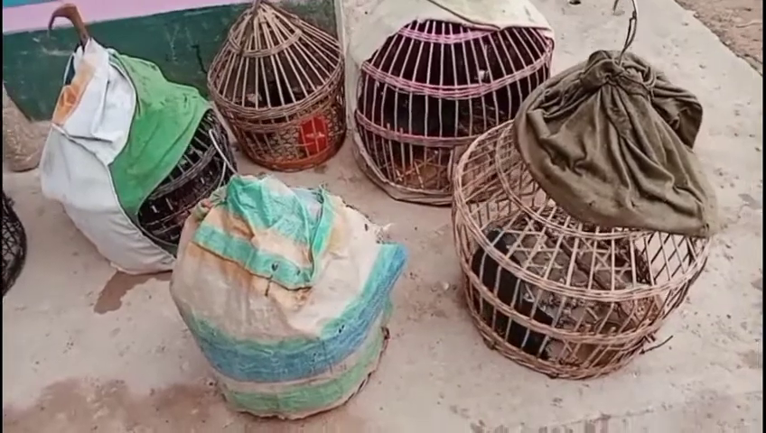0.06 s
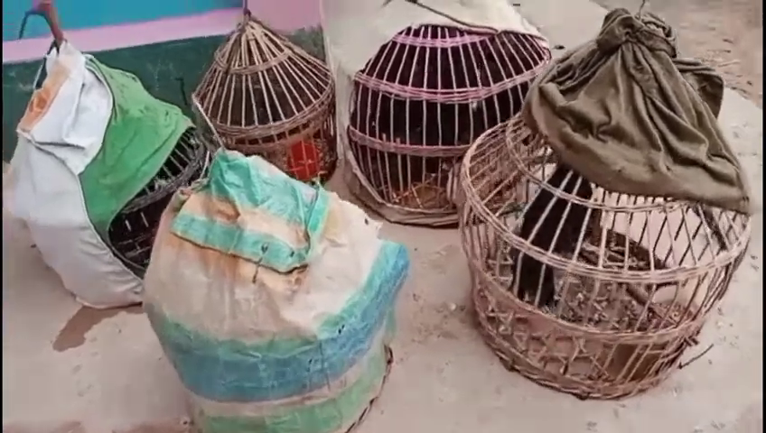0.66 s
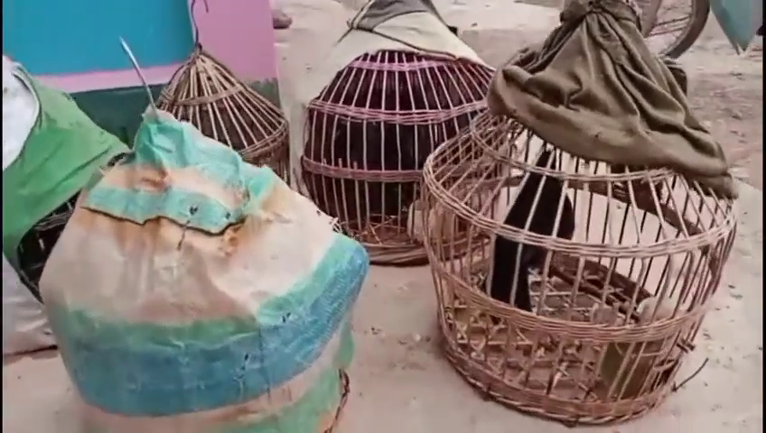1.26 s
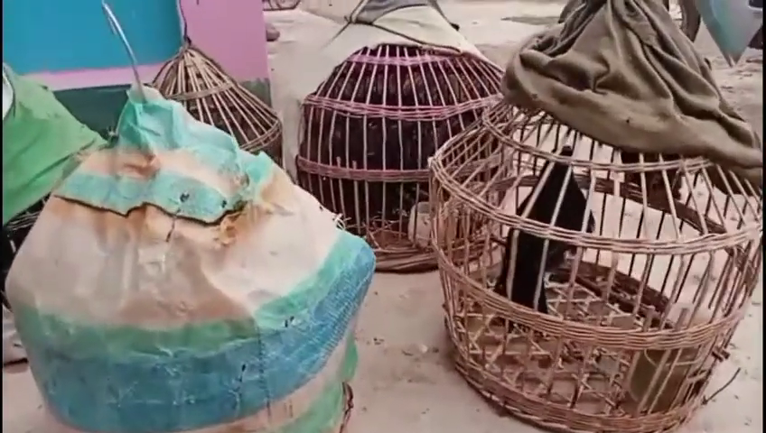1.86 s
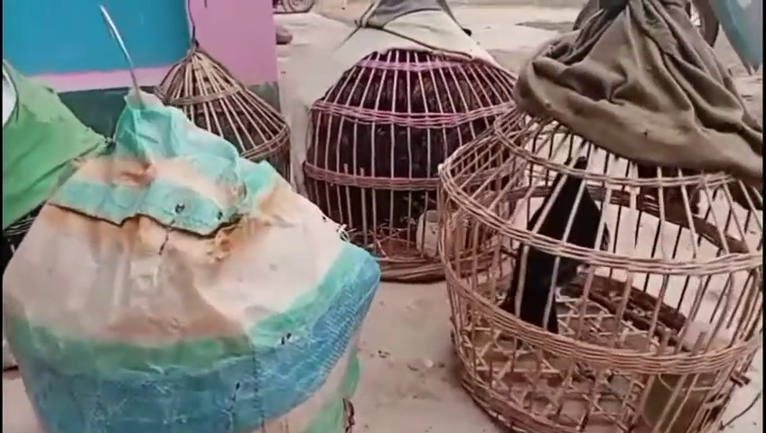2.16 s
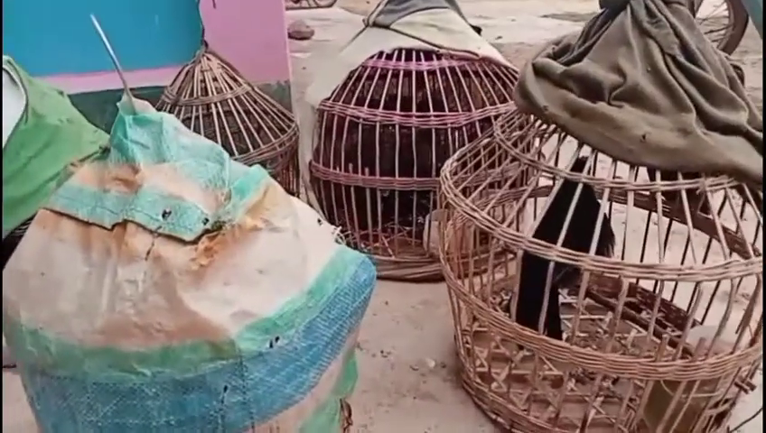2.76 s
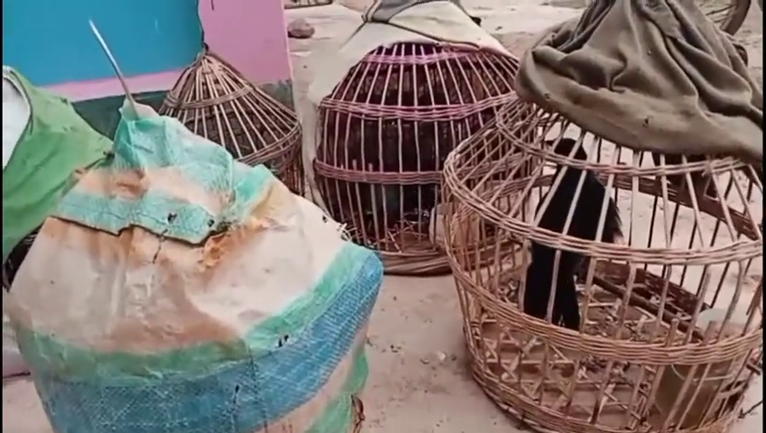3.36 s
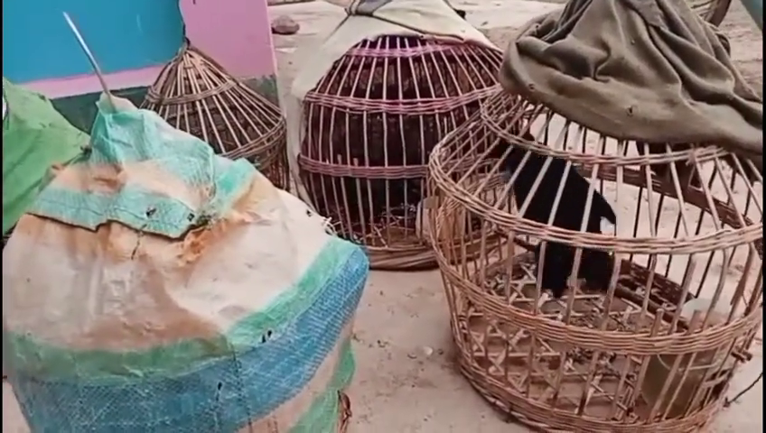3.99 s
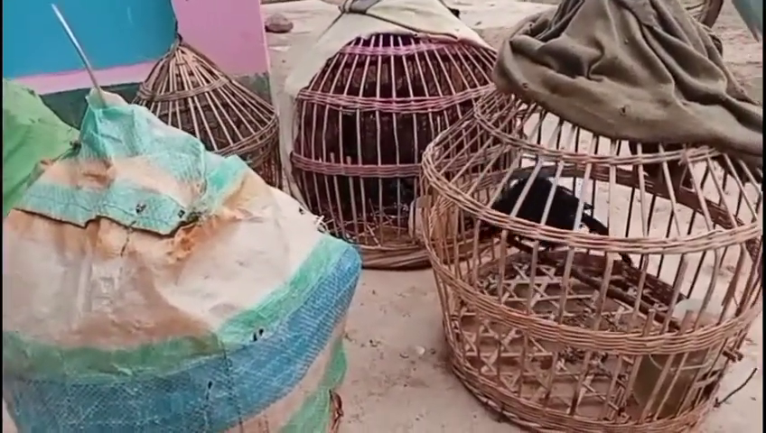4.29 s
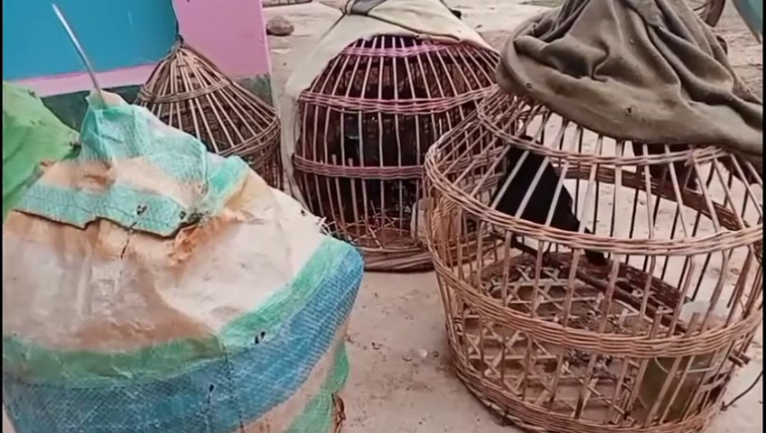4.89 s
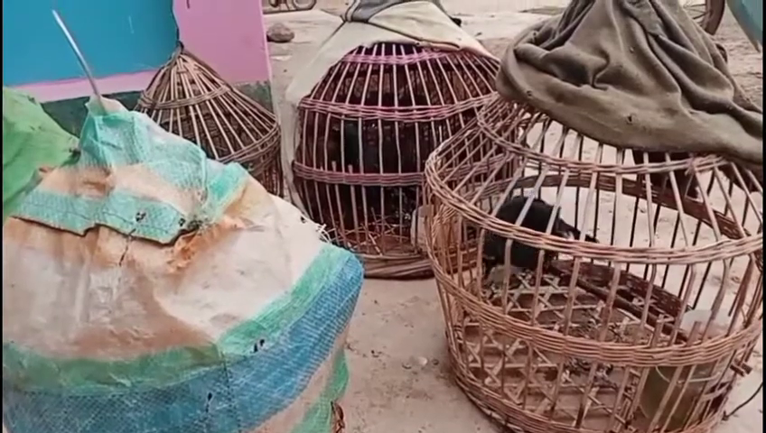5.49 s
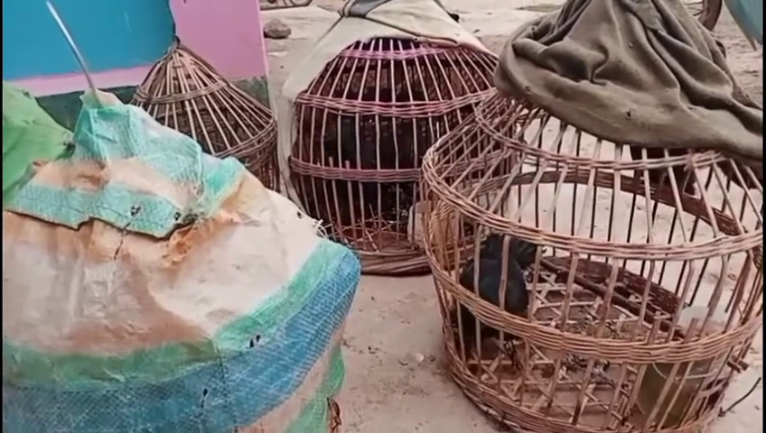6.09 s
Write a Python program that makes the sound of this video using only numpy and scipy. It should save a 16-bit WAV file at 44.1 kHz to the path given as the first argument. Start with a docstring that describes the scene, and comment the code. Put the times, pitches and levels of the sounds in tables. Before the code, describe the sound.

Birds in wicker cages call loudly, close to the microphone, in an open yard. Runs of quick falling yelps overlap harsh rasps and nasal whines, with a few dull knocks and ticks. Midway comes a short wavering wail, then rapid chucks, clear pips and two longer squeals take over. Hoarse chatter sits behind, and a faint low throb like a distant idling engine fades after the middle.

```python
"""In a yard of wicker cages, birds call close by: yelps, chucks, rasps, whines, squeals and pips overlap.
Each voice is a source and a filter: membranes in the syrinx vibrate at a pitch set by their tension,
and throat and beak resonances shape the harmonics. Hoarse chatter, dull knocks and sharp ticks lie
between the calls, over a low throb like a distant idling engine. Ground and walls add a short echo,
and the loudest calls overload the microphone."""
import sys
import numpy as np
from scipy import signal
from scipy.fft import rfft, irfft, next_fast_len
from scipy.io import wavfile
from scipy.ndimage import uniform_filter1d, map_coordinates

SR = 44100
rng = np.random.default_rng(int(sys.argv[2]) if len(sys.argv) > 2 else 0)


def unload_wav(signal):
    """Save mono or channel-first audio to the path in sys.argv[1] as 16-bit WAV at rate SR, clipped to [-1, 1]."""
    wavfile.write(
        sys.argv[1],
        SR,
        np.round(np.clip(np.atleast_2d(signal).T, -1, 1) * 32767).astype(np.int16),
    )


N = 275184
TIME = np.arange(N) / SR
TOP_HZ = 15600


def undb(db):
    """Decibels to amplitude."""
    return 10 ** (np.asarray(db) / 20)


def unit(x):
    """Scale to rms 1."""
    return x / (np.std(x) + 1e-12)


def add(out, start, x):
    """Superposition: mix x in at a time in seconds."""
    i = int(np.clip(start * SR, 0, N - 1))
    out[i:i + len(x)] += x[:N - i]


def clock(length):
    """Seconds since the start of a call."""
    return np.arange(max(int(length * SR), SR // 100)) / SR


def phase_of(hz):
    """Phase in radians is the integral of frequency."""
    return 2 * np.pi * np.cumsum(hz) / SR


def gain(response, hz):
    """Gain of a (Hz, dB) response at given frequencies."""
    f, db = np.transpose(response)
    return undb(np.interp(np.log(hz + 1), np.log(f), db))


def colour(x, response):
    """Filtering multiplies the spectrum by a (Hz, dB) response."""
    size = next_fast_len(len(x) + 512)
    hz = np.arange(size // 2 + 1) * SR / size
    return irfft(rfft(x, size) * gain(response, hz), size)[:len(x)]


def wander(t, rate):
    """Smooth random modulation, spread near 1, with new values at a rate per second."""
    return map_coordinates(rng.standard_normal(8192), [t * rate], order=2, mode="wrap")


def fade(t, attack_s, release_s):
    """Trapezoidal envelope: attack, hold and release."""
    return np.clip(np.minimum(t / attack_s, (t[-1] - t) / release_s), 0, 1)


def quavering(t, hz, depth):
    """Frequency modulation: a smoothed pitch contour quavers slightly."""
    return uniform_filter1d(hz, size=300) * (1 + depth * wander(t, 67.85))


# The beak's treble resonance. Each row: frequency in Hz, gain in dB.
BEAK = [(3500, -15), (5000, -15), (6100, -7), (7200, 2), (8200, -10.5), (9600, -20.5), (12000, -44.5),
        (15000, -18)]


def syrinx(t, hz, rough, treble_db, throat, beak=BEAK, jitter=0.06, shimmer=0.84, ring_s=0.0003906):
    """Source and filter: harmonics pass throat and beak; roughness adds jitter, shimmer and breath."""
    phase = phase_of(hz * (1 + jitter * rough * wander(t, 913)))
    k = np.arange(1, 37)[:, None]
    # the ringing throat delays each harmonic by its own amount, spreading every pulse
    lag = 2 * np.pi * ring_s * np.sqrt(k * hz * TOP_HZ)
    partials = np.cos(k * phase - lag) * (k * hz < TOP_HZ)
    breath = rng.standard_normal(SR)[:len(t)] * (1 + .5 * np.cos(phase))
    out = 0
    for tract, db in ((throat, 0), (beak, treble_db)):
        weights = gain(tract, k * hz)
        tone = (weights * partials).sum(0) / np.sqrt((weights ** 2).sum(0) / 2)
        out = out + undb(db) * (tone + .55 * rough * unit(colour(breath, tract)))
    return out * (1 + shimmer * rough * wander(t, 604))


def whistle(t, hz, octave_db, treble_db, jitter=0.019, flutter=0.06):
    """Additive synthesis: a shaky sine, its octave and faint overtones weighted by the beak."""
    phase = phase_of(hz * (1 + jitter * wander(t, 793)))
    overtones = sum(gain(BEAK, k * hz) * np.sin(k * phase) for k in range(3, 8))
    tone = np.sin(phase) + undb(octave_db) * np.sin(2 * phase) + undb(treble_db) * overtones
    return unit(tone) * (1 + flutter * wander(t, 338))


# Plunging yelps. Each row: start in seconds, relative level in dB, treble in dB, hold in seconds.
YELPS = [(.07, -6, -9, 0.013), (.128, -10.5, -5, 0.015), (.167, -7.5, -1.5, 0.01), (.243, -10, -12, 0.017),
         (0.317, -14, -7.5, .018), (.818, -10, -26, 0.003), (0.845, -9.5, -13.5, 0.0086),
         (.933, -2.5, -8, 0.0047), (1.005, -6.5, -5.5, 0.0046), (1.063, -7.5, -8.5, 0.015),
         (1.409, -5.5, -9.5, 0.0087), (1.469, -5, -8.5, 0.0066), (1.531, -7.5, -7, .016),
         (1.595, -7.5, -10.5, 0.013), (1.658, -11, -5.5, 0.012), (1.717, -16.5, -7, 0.0088),
         (1.993, -10.5, -11, 0.0067), (2.067, -7, -8, .011), (2.125, -6, -12.5, .015),
         (2.187, -8.5, -11, 0.017), (2.474, -3.5, -22, 0.0045), (3.335, -4, -15, 0.0058),
         (3.376, -4, -14.5, .003), (3.459, -6.5, -14, 0.0097), (3.533, -4, -13.5, .01),
         (3.596, -3.5, -15, 0.013), (3.653, -3.5, -14, 0.0081), (3.715, -10, -10, .003),
         (4.577, -5.5, -7.5, .005), (4.957, -7, -9.5, 0.0039), (5.026, -3, -13, 0.0044),
         (5.088, -7.5, -12, 0.0079), (5.141, -2, -12.5, 0.0057), (5.871, -5.5, -9, 0.0052)]
# Their throat response. Each row: frequency in Hz, gain in dB.
YELP_THROAT = [(250, -19), (430, 2.5), (750, 2), (1250, 7.5), (1800, -2.5), (2500, 1.5), (3200, -4.5),
               (3900, -10.5), (4900, -60), (6500, -60), (10000, -38), (15000, -36)]


def yelps(top_hz=1340, rest_hz=350, sag=0.0421, fall_s=.0105, edge_s=0.011, decay_s=0.015, level_db=-8):
    """Tension sets pitch: the membrane holds a clean high note, then slackens, plunges and roughens."""
    out, t = np.zeros(N), clock(.1)
    taut_rough, slack_rough = 0.037, 0.42
    for start, db, treble_db, hold_s in YELPS:
        swell = np.minimum(t / max(hold_s, .003), 1)
        slack_s = np.maximum(t - hold_s, 0)
        tension = (1 - sag * swell ** 2) * np.exp(-slack_s / fall_s)
        hz = (rest_hz + (top_hz - rest_hz) * tension) * (1 + 0.0241 * wander(t, 127))
        rough = slack_rough + (taut_rough - slack_rough) * tension
        voice = syrinx(t, hz, rough, treble_db, YELP_THROAT)
        push = np.minimum(1.25 * swell, 1) * np.exp(-slack_s / decay_s) * fade(t, edge_s, edge_s)
        add(out, start, voice * push * undb(db + level_db))
    return out


# Abrupt chucks. Each row: start in seconds, relative level in dB, treble in dB.
CHUCKS = [(3.744, -8.5, -16), (3.818, -10, -21), (3.879, -9, -3), (4.017, -16, -1), (4.094, -7, -14),
          (4.16, -2, -22), (4.253, -5, -26), (4.33, -3.5, -28), (4.49, -4.5, -21.5), (4.68, -9.5, -19),
          (4.853, -15, -5.5), (5.054, -4, -38), (5.12, -2.5, -22), (5.182, -0.5, -20), (5.247, -4.5, -13),
          (5.307, -8, -5), (5.371, -1, -21), (5.44, -1, -33), (5.502, -1, -23), (5.534, -9.5, -15),
          (5.599, 0.5, -18), (5.663, -1.5, -15), (5.8, -8, -9), (5.823, -3, -30), (5.906, -5, -19),
          (6.114, .5, -22.5), (6.191, 1, -23)]
# Their throat response. Each row: frequency in Hz, gain in dB.
CHUCK_THROAT = [(250, -35), (450, -2.5), (800, -6), (1400, -7), (1900, 5.5), (2400, 5), (3100, -8.5),
                (4000, -22), (5400, -21.5), (10000, -52), (15000, -38)]


def chucks(top_hz=1500, rest_hz=350, fall_s=.0065, edge_s=0.0062, decay_s=0.0093, level_db=-2, rough=.25):
    """Impulsive drive: after a sudden push the harmonics sweep down through the throat resonance."""
    out, t = np.zeros(N), clock(1 / 12)
    hz = rest_hz + (top_hz - rest_hz) * np.exp(-t / fall_s)
    push = fade(t, edge_s, edge_s) * np.exp(-t / decay_s)
    for start, db, treble_db in CHUCKS:
        voice = syrinx(t, hz, rough, treble_db, CHUCK_THROAT)
        add(out, start, voice * push * undb(db + level_db))
    return out


# Harsh rasps. Each row: start and length in seconds, level and its drop in dB,
# first and settled whistle pitch in Hz, whistle over rattle in dB, treble in dB.
RASPS = [(0, 0.23, -10.5, 8.5, 1611, 1776, -1, -20.5), (.228, 0.083, -14.5, 10, 2650, 2094, 4.5, -7),
         (.401, 0.083, -8, 4.5, 2100, 1447, 6.5, -26), (0.438, 0.099, -12.5, 0, 2153, 2152, 3, -32),
         (0.524, 0.22, -10, 15, 1588, 1587, -3, -33), (0.74, 0.064, -19, 6, 1592, 1610, -3, -19),
         (1.098, 0.068, -9, 10.5, 1837, 1852, 3, -27), (1.768, .15, -14, 6.5, 2497, 1495, -5, -12.5),
         (2.217, .11, -11.5, -1.5, 2178, 1771, 1, -15), (2.318, .18, -8.5, 9.5, 1405, 1407, -3, -26),
         (2.847, 0.2, -4.5, 14.5, 1861, 1720, -0.5, -20), (5.67, .209, -9, 7.5, 2370, 1597, 1, -17.5),
         (5.903, 0.066, -6, 13.5, 2164, 2074, -3.5, -11), (5.969, 0.083, -11, 0.5, 2530, 2000, -7.5, -9.5),
         (6.03, 0.079, -4, 10, 1558, 1808, -1, -20.5)]
# The response that shapes their rattle. Each row: frequency in Hz, gain in dB.
RATTLE = [(300, -32), (700, -4), (1200, 3), (1700, 1), (2500, 4.5), (3150, -2.5), (3800, -7.5),
          (4800, -16.5), (7000, -56), (15000, -17)]


def rasps(flap_hz=470, stagger=.16, settle_s=.06, whistle_fade_db_per_s=36, beak_close_db_per_s=100):
    """Aperiodic vibration: hard-driven membranes flap under a fading whistle while the beak closes."""
    out = np.zeros(N)
    throat = [(150, -19), (600, -7.5), (3300, -4.5), (4500, -17.5)]
    for start, length, db, drop_db, first_hz, settled_hz, whistle_db, treble_db in RASPS:
        t = clock(length)
        hz = settled_hz + (first_hz - settled_hz) * np.exp(-t / settle_s)
        # the flap rate follows the whistle; air escapes once a flap
        cycles = np.cumsum(flap_hz * hz / np.mean(hz) * np.exp(stagger * wander(t, 500))) / SR
        flaps = np.diff(np.floor(cycles), prepend=0) * (1 + 0.18 * wander(t, 495.3))
        puffs = rng.standard_normal(SR)[:len(t)] * np.exp(-2 * (cycles % 1))
        drive = unit(flaps) + .8 * unit(puffs)
        shaky_hz = hz * (1 + 0.0669 * wander(t, 453.3))
        tone = unit(np.sin(phase_of(shaky_hz)) * (1 + 0.053 * wander(t, 261)))
        swing = unit(unit(colour(drive, RATTLE)) + undb(whistle_db - whistle_fade_db_per_s * t) * tone)
        body = unit(colour(np.tanh(swing), throat))  # the limited swing keeps the rasp dense
        beak = undb(treble_db - beak_close_db_per_s * t) * unit(colour(drive, BEAK))
        push = undb(db - drop_db * t / length) * fade(t, attack_s=0.013, release_s=0.0094)
        add(out, start, (body + beak) * push)
    return out


# Nasal whines. Each row: start and length in seconds, first and last pitch in Hz,
# level in dB, roughness from 0 to 1, treble in dB.
WHINES = [(0.332, 0.064, 654, 404, -24, 0.42, -14), (0.876, 0.07, 619, 376, -24, .1, -17),
          (1.118, 0.097, 718, 423, -20.5, 0.3, -8.5), (1.206, .12, 556, 495, -26, 0.66, -45),
          (1.323, 0.094, 934, 769, -24.5, 0.16, -23), (1.366, 0.13, 696, 511, -26.5, 0.43, -31),
          (2.733, .11, 639, 315.6, -20.5, 0.39, -15.5), (3.283, 0.095, 615, 299, -21.5, 0.2, -23),
          (3.386, 0.073, 763, 647, -23, 0, -30), (3.522, 0.082, 700, 431, -28.5, 0.4, -25),
          (3.721, .09, 700, 451, -24, 0.42, -30)]
# Their throat response. Each row: frequency in Hz, gain in dB.
WHINE_THROAT = [(280, -19), (480, -7), (850, 3), (1250, 2.5), (1800, 1), (2500, 1), (3200, -9), (4000, -13),
                (5000, -62), (15000, -39)]


def whines(sag_s=.045, quaver=0.0257, edge_s=0.002):
    """Exponential relaxation: as the membrane slackens the pitch sinks quickly, then levels out."""
    out = np.zeros(N)
    for start, length, first_hz, last_hz, db, rough, treble_db in WHINES:
        t = clock(length)
        relaxed = 1 - np.exp(-t / sag_s)
        hz = quavering(t, first_hz + (last_hz - first_hz) * relaxed / relaxed[-1], quaver)
        voice = syrinx(t, hz, rough, treble_db, WHINE_THROAT)
        add(out, start, voice * undb(db) * fade(t, edge_s, edge_s))
    return out


# One wail that dips, arches and drops. Each row: time in seconds, pitch in Hz, level in dB.
WAIL = [(3.017, 1582, -25), (3.033, 899, -13), (3.055, 615, -15), (3.101, 436.6, -17.5), (3.128, 514, -19),
        (3.149, 867, -18), (3.172, 1118, -18), (3.202, 1074, -17.5), (3.226, 552, -20)]
# Its throat response. Each row: frequency in Hz, gain in dB.
WAIL_THROAT = [(280, -23), (480, -6.5), (850, -4.5), (1250, 3), (1800, -0.5), (2400, -5), (3300, -24),
               (4400, -25), (5200, -48), (15000, -36)]


def wail(quaver=0.0156, taut_hz=1100, edge_s=0.012):
    """Tension sets timbre: a taut membrane sounds clean and bright, a slack one rough and dull."""
    out = np.zeros(N)
    times, pitch, db = np.transpose(WAIL)
    start = times[0]
    t = clock(times[-1] - start)
    hz = quavering(t, np.interp(start + t, times, pitch), quaver)
    slack_to_taut = [pitch.min(), taut_hz]
    rough = np.interp(hz, slack_to_taut, [0.45, 0.027])
    treble_db = np.interp(hz, slack_to_taut, [-13, -2])
    push = undb(np.interp(start + t, times, db)) * fade(t, edge_s, edge_s)
    add(out, start, syrinx(t, hz, rough, treble_db, WAIL_THROAT) * push)
    return out


# Long squeals. Each row: start and length in seconds, level before the accent in dB,
# extra roughness at the onset from 0 to 1, treble in dB, beak resonance in Hz.
SQUEALS = [(3.858, .318, -22.5, 0.19, -18.5, 7900), (5.192, .295, -23, 0.71, -9.5, 6340)]
# Their pitch contour. Each row: fraction of the length, pitch in Hz.
SQUEAL_TUNE = [(0, 504), (.09, 1100), (.17, 1222), (.32, 1206), (.49, 1158), (.67, 1052), (.92, 981),
               (1, 860)]
# Their throat response. Each row: frequency in Hz, gain in dB.
SQUEAL_THROAT = [(400, 0), (1150, 2.5), (2300, -1), (3550, -2.5), (4700, -19), (6100, -11.5), (7200, -13.5),
                 (11000, -31), (15000, -44)]
# Their sharp beak resonance. Each row: multiple of the centre frequency, gain in dB.
SQUEAL_BEAK = [(.7, -65), (.88, -13), (1, 4), (1.15, -10), (1.4, -19.5), (1.7, -29)]


def squeals(quaver=0.00484, accent_db=5, settle_s=0.18, clear_s=.04, steady_rough=0.0072):
    """Onset transient: a hard, rough push scoops up to a high note, which clears and slowly sags."""
    out = np.zeros(N)
    for start, length, db, onset_rough, treble_db, beak_hz in SQUEALS:
        t = clock(length)
        hz = quavering(t, np.interp(t / length, *np.transpose(SQUEAL_TUNE)), quaver)
        rough = steady_rough + onset_rough * np.exp(-t / clear_s)
        beak = [(beak_hz * ratio, gain_db) for ratio, gain_db in SQUEAL_BEAK]
        voice = syrinx(t, hz, rough, treble_db, SQUEAL_THROAT, beak)
        push = undb(db + accent_db * np.exp(-t / settle_s))
        add(out, start, voice * push * fade(t, attack_s=.014, release_s=0.025))
    return out


# Open-beaked barks. Each row: start and length in seconds, top pitch in Hz, level and treble in dB.
BARKS = [(2.558, .039, 1042, -15, -3.5), (2.647, .036, 1086, -15.5, -5)]
# Their throat response. Each row: frequency in Hz, gain in dB.
BARK_THROAT = [(300, -2), (1000, 4), (2000, 4.5), (3000, 1), (4200, 4.5), (5100, -55), (10000, -60),
               (15000, -47)]


def barks(drop=0.64, quaver=0.017, rough=.45):
    """Jitter and breath noise make short shouts hoarse; their pitch arches up and down."""
    out = np.zeros(N)
    for start, length, top_hz, db, treble_db in BARKS:
        t = clock(length)
        arch = np.sin(np.pi * t / length)
        hz = quavering(t, top_hz * (1 - drop * (1 - arch)), quaver)
        voice = syrinx(t, hz, rough, treble_db, BARK_THROAT)
        add(out, start, voice * undb(db) * fade(t, attack_s=0.0066, release_s=0.023))
    return out


# Clear pips. Each row: start in seconds, first pitch in Hz, level in dB.
PIPS = [(0.397, 1505, -14), (2.841, 1690, -13), (3.935, 1810, -13.5), (4.009, 1994, -11.5),
        (4.089, 1958, -10.5), (4.475, 2085, -19), (4.577, 2380, -11), (5.041, 1595, -10), (5.108, 1846, -8),
        (5.296, 1439, -13.5), (5.433, 1804, -15), (5.955, 2070, -10), (6.177, 1944, -11.5)]


def pips(length_s=0.0279, fall_octaves=0.475, edge_s=0.011):
    """Exponential glide: short whistles all slide down by the same interval."""
    out, t = np.zeros(N), clock(length_s)
    for start, first_hz, db in PIPS:
        hz = first_hz * 2 ** (-fall_octaves * t / length_s)
        tone = whistle(t, hz, octave_db=-17.5, treble_db=-31)
        add(out, start, tone * undb(db) * fade(t, edge_s, edge_s))
    return out


# Rising whoops. Each row: start and length in seconds, first and last pitch in Hz, midway level in dB.
WHOOPS = [(4.621, 0.047, 733, 1313, -11.5), (4.795, .057, 770, 1440, -9.5)]


def whoops(swell_db=19, first_octave_db=7, last_octave_db=-24, edge_s=0.018):
    """Linear glide: whistles swell as they rise, and the second harmonic yields to the fundamental."""
    out = np.zeros(N)
    for start, length, first_hz, last_hz, db in WHOOPS:
        t = clock(length)
        rise = t / length
        hz = first_hz + (last_hz - first_hz) * rise
        octave_db = first_octave_db + (last_octave_db - first_octave_db) * rise
        tone = whistle(t, hz, octave_db, treble_db=-36)
        add(out, start, tone * undb(db + swell_db * (rise - 0.5)) * fade(t, edge_s, edge_s))
    return out


# Bouts of soft chatter. Each row: start and length in seconds, level in dB.
CHATTER = [(0, 0.27, -20), (0.296, 0.36, -28), (0.82, 1.56, -33.5), (3.66, 0.26, -23), (3.862, 0.36, -23),
           (4.232, .8, -25), (5.061, 0.478, -19), (5.648, 0.53, -23)]


def chatter(stutter_db=4, grain_db=3, edge_s=0.017):
    """Amplitude-modulated noise: hoarse birds further off rattle in quick, uneven bursts."""
    throat = [(350, -40), (800, -2), (1400, 7), (2100, 6.5), (2600, 3), (3300, -1.5), (4300, -24),
              (12000, -71)]
    bouts = np.zeros(N)
    for start, length, db in CHATTER:
        add(bouts, start, undb(db) * fade(clock(length), edge_s, edge_s))
    bursts = undb(stutter_db * np.tanh(wander(TIME, 60)) + grain_db * wander(TIME, 400))
    return unit(colour(rng.standard_normal(N) * bursts, throat)) * bouts


def warble(start_s=4.38, length_s=.66, first_hz=760, last_hz=792, trill_hz=22, db=-27.5, edge_s=0.0035):
    """Frequency modulation: a faint low note drifts upward with a quick vibrato."""
    out, t = np.zeros(N), clock(length_s)
    vibrato = 1 + 0.091 * np.sin(2 * np.pi * trill_hz * t) + 0.0334 * wander(t, 200)
    hz = np.linspace(first_hz, last_hz, len(t)) * vibrato
    add(out, start_s, unit(np.sin(phase_of(hz))) * undb(db) * fade(t, edge_s, edge_s))
    return out


# Dull knocks. Each row: start in seconds, peak level in dB.
KNOCKS = [(0.495, -15.5), (0.579, -15.5), (.657, -17.5), (0.917, -21), (1.844, -24), (1.872, -17.5),
          (1.895, -18.5), (1.977, -13.5), (2.002, -16), (2.025, -15.5), (2.118, -19.5), (2.141, -15.5),
          (2.98, -23)]


def knocks(rest_hz=170, sweep_hz=750, fall_s=0.0023, peak_s=0.0023):
    """Heavy damping: each knock drops in pitch and dies within a few cycles."""
    out, t = np.zeros(N), clock(1 / 30)
    hz = rest_hz + sweep_hz * np.exp(-t / fall_s)
    knock = np.sin(phase_of(hz)) * t / peak_s * np.exp(1 - t / peak_s)
    for start, db in KNOCKS:
        add(out, start, knock * undb(db))
    return out


# Sharp ticks. Each row: start in seconds, relative level in dB.
TICKS = [(.2474, -25), (1.13, -8.5), (1.2168, -13.5), (1.5894, -23), (2.1822, -8), (2.9796, -21),
         (3.294, -18.5), (3.37, -17), (3.4053, -8.5), (4.374, -13), (4.3919, -9), (4.644, -13)]
# Their spectrum. Each row: frequency in Hz, gain in dB.
TICK_SPECTRUM = [(1000, -8), (4000, -8), (6800, 4), (8500, -7), (11000, -13.5), (15000, -7)]


def ticks(level_db=-7, decay_s=0.0025):
    """Broadband transients: bright noise decays exponentially within milliseconds."""
    out, t = np.zeros(N), clock(1 / 30)
    for start, db in TICKS:
        burst = unit(colour(rng.standard_normal(len(t)), TICK_SPECTRUM))
        add(out, start, burst * np.exp(-t / decay_s) * undb(db + level_db))
    return out


# Low bumps. Each row: start in seconds, level in dB.
BUMPS = [(2.525, -28.5), (2.638, -43), (3.33, -27.5), (4.4, -41), (5.239, -33), (6.083, -23.5)]


def bumps(edge_s=0.0033, decay_s=0.022):
    """Band-limited transients: decaying bursts of bass noise give a soft boom."""
    out, t = np.zeros(N), clock(1 / 8)
    spectrum = [(50, -36), (140, 7), (280, -5), (600, -8), (2000, -70)]
    for start, db in BUMPS:
        boom = unit(colour(rng.standard_normal(len(t)), spectrum))
        add(out, start, boom * fade(t, edge_s, edge_s) * np.exp(-t / decay_s) * undb(db))
    return out


# The course of the low throb. Each row: time in seconds, resonance in Hz, level in dB.
THROB = [(0, 98.7, -42), (1.7, 95.4, -40.5), (2.2, 110, -36), (2.85, 104, -37.5), (3.9, 105, -62),
         (6.24, 99, -68)]


def throb(pulse_hz=13.2, decay_periods=0.25):
    """Periodic excitation: slow, even pulses ring one damped low resonance."""
    times, hz, db = np.transpose(THROB)
    cycle = TIME * pulse_hz % 1
    ringing = np.sin(2 * np.pi * np.interp(TIME, times, hz) * cycle / pulse_hz)
    pulses = ringing * np.sin(np.pi * cycle) * np.exp(-cycle / decay_periods)
    return unit(pulses) * undb(np.interp(TIME, times, db) + wander(TIME, 5.53))


# The spectrum of the yard's air. Each row: frequency in Hz, gain in dB.
AIR_SPECTRUM = [(25, -16), (80, -9.5), (160, -7.5), (300, -14.5), (600, 1), (1500, -5), (2600, 0.5),
                (4700, -24), (7000, -22.5), (11000, -36), (15000, -34)]


def yard_air(level_db=-32, swell_db=2):
    """Ambient noise: a broad, steady spectrum swells and ebbs gently."""
    noise = unit(colour(rng.standard_normal(N), AIR_SPECTRUM))
    return noise * undb(level_db + swell_db * wander(TIME, 4.3))


def yard_echo(x, wall_s=.0115, wall_db=-8, early_db=-10, early_t60=0.041, late_db=-22, late_t60=0.94):
    """Reflection: one echo from the nearest wall, quick scatter from cages and ground, a faint tail."""
    t = clock(.5)
    early, late = (rng.standard_normal(len(t)) * undb(-60 * t / t60) * (t > .004)
                   for t60 in (early_t60, late_t60))
    tail = colour(late, [(2500, -10.5), (8000, -2)]) / np.linalg.norm(late)
    response = undb(early_db) * early / np.linalg.norm(early) + undb(late_db) * tail
    response[int(wall_s * SR)] += undb(wall_db)
    return x + signal.fftconvolve(x, response)[:N]


def scene():
    """Superposition: the birds echo in the yard, over knocks, ticks, bumps, air and throb."""
    short_calls = yelps() + chucks() + barks() + pips() + whoops()
    long_calls = rasps() + whines() + wail() + squeals()
    birds = yard_echo(short_calls + long_calls + chatter() + warble())
    return (birds + knocks() + ticks() + bumps() + yard_air() + throb())[None]


def record(dry):
    """Overload and band limiting: the loudest peaks clip, then the deep bass and the top are cut."""
    high_pass = signal.butter(2, 60, "high", fs=SR, output="sos")
    low_pass = signal.ellip(10, .2, 70, TOP_HZ, fs=SR, output="sos")
    clipped = np.clip(dry, -1, 1)
    return signal.sosfilt(low_pass, signal.sosfilt(high_pass, clipped))


dry = scene()
out = record(dry)
unload_wav(out)
```